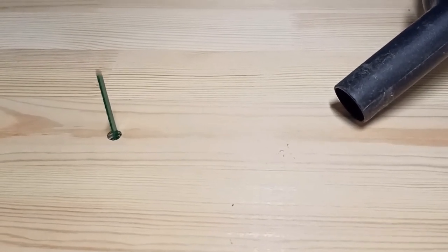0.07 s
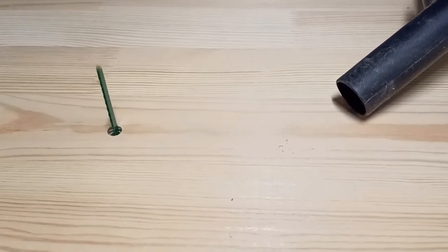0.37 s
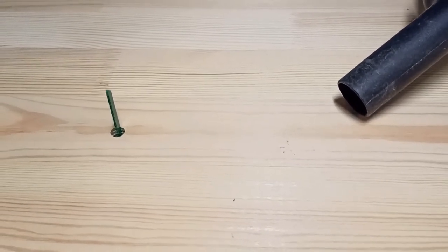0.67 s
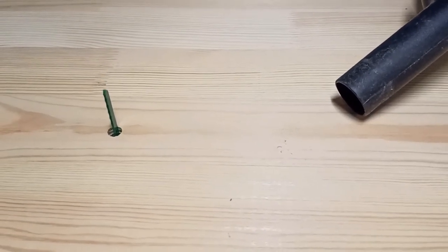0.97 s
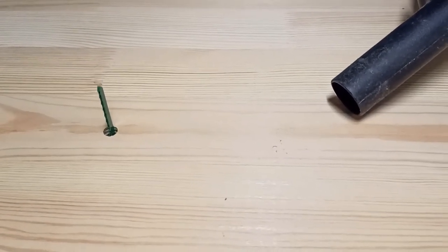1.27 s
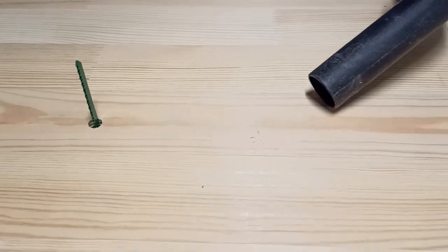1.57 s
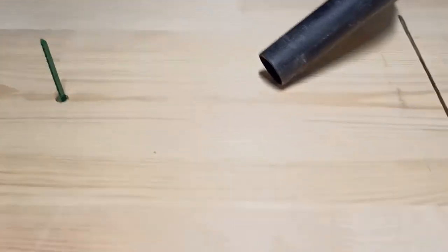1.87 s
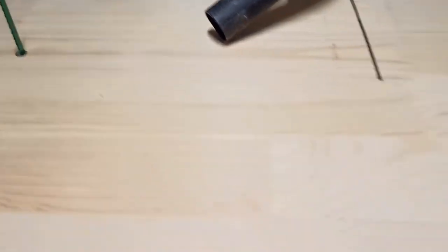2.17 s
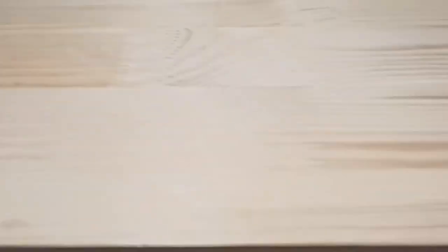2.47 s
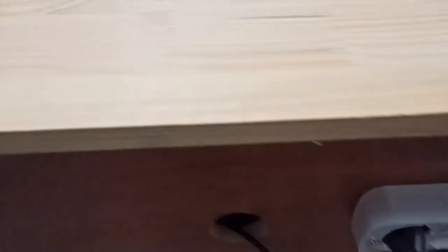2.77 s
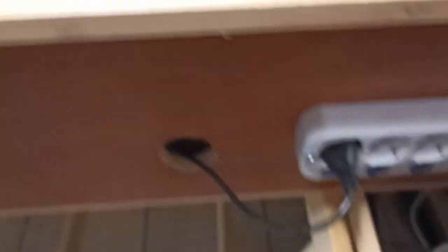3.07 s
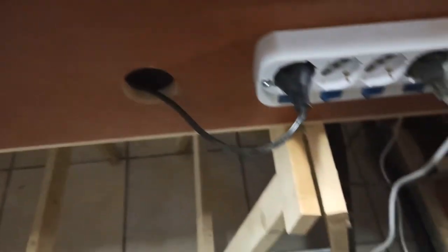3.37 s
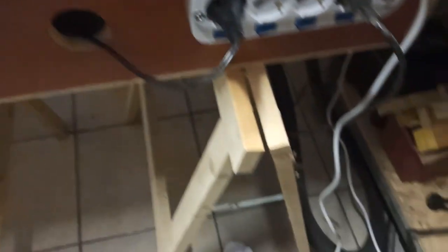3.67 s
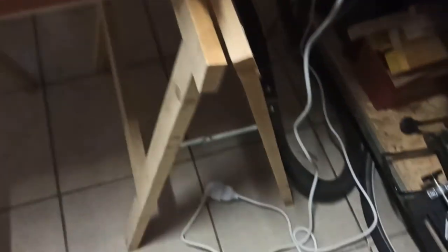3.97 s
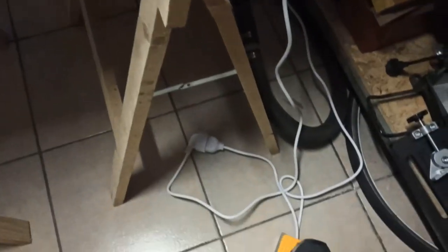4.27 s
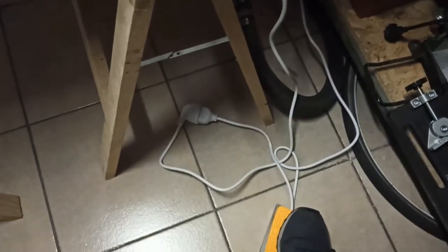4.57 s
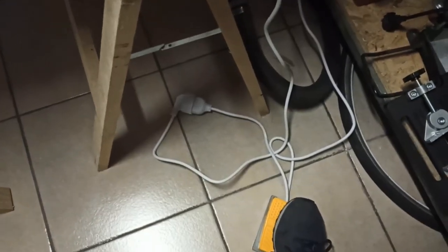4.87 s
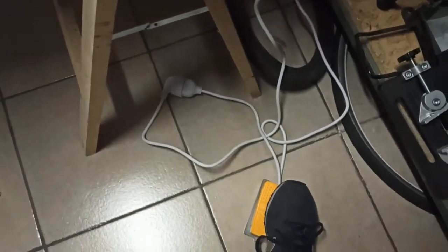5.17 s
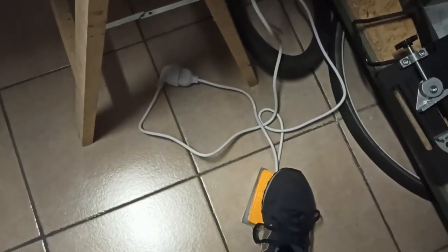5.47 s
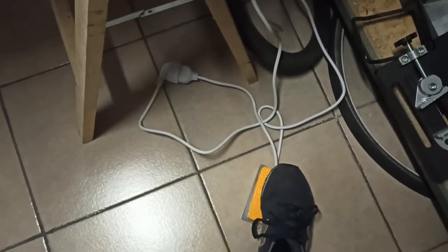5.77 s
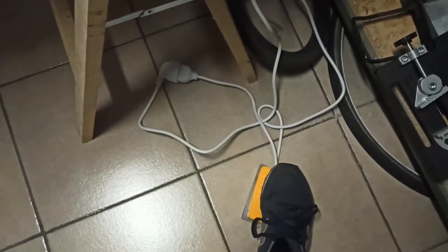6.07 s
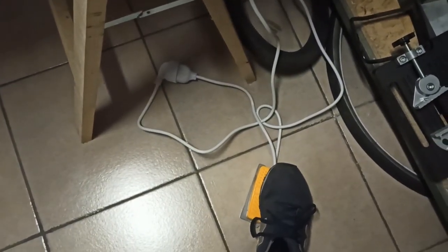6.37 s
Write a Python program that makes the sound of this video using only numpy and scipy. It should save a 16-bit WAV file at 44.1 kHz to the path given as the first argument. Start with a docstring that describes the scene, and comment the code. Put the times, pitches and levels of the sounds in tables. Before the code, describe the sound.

In a small workshop, a hand-held microphone picks up the slowing metallic knocks of a jigsaw, rumbling through a wooden bench. Once it stops, a vacuum is left quietly whining down, interrupted by plastic snaps and dull bumps right at the microphone. After a faint creak from a foot switch, the saw starts with a clink and quickly reaches a loud, whining roar that shakes the bench.

```python
"""A small workshop, beside a wooden bench, heard through the small microphone of a hand-held camera.
A jigsaw mounted under the bench and a vacuum share one foot switch. The saw's blade knocks slower and
slower to a stop, ringing the wood, while the vacuum's impeller whines down. The camera's case clicks
and thumps as it is moved. Then the pedal creaks, and the saw races up to a roar with a whine on top."""
import sys
import numpy as np
from scipy import signal
from scipy.fft import rfft, irfft, next_fast_len
from scipy.io import wavfile

SR = 44100
rng = np.random.default_rng(int(sys.argv[2]) if len(sys.argv) > 2 else 0)


def to_wav(sig):
    """Store sig (one row per channel, or 1-D mono) as 16-bit WAV at the path in sys.argv[1].

    Samples outside -1..1 are clipped; the rate is SR.
    """
    pcm = np.clip(np.atleast_2d(sig), -1, 1) * 32767
    pcm = np.round(pcm).astype(np.int16)
    wavfile.write(sys.argv[1], SR, pcm.T)  # frames by channels


N = 287091
TIME = np.arange(N) / SR
SWITCH_ON_S, BAND_LIMIT_HZ = 5.589, 15950

# room tone spectrum: freq_hz, level_db
ROOM_SPECTRUM = [(60, 1.5), (130, 11), (300, 4.5), (600, 1), (1500, -14), (2600, -15), (3500, -5.5),
                 (4600, -20.5), (5400, -22.5), (6500, -15), (8200, -33), (12000, -5.5), (15500, -13.5)]
# faint hum under the bench: time_s, level_db
HUM_LEVELS = [(1.6, -71.5), (3.5, -56.5), (4.5, -58.5), (5, -52.5), (5.5, -51)]
# the microphone's port resonances and notch: freq_hz, gain_db
MIC_RESPONSE = [(20, -2.5), (48, -11.5), (72, 0), (3000, -4.5), (3700, 0.5), (4680, 1), (4900, -5.5),
                (5900, -3), (6250, 5), (7500, -1), (8400, -10.5), (8900, -32), (10000, -43), (11400, -36.5),
                (11750, -13), (15500, -11.5)]
# bumps of the camera's case in the hand: start_s, level_db, pitch_hz
CASE_BUMPS = [(1.8418, -11, 1010), (1.955, -29, 200), (2.3825, -25.5, 900), (2.4043, -24, 750),
              (2.4242, -19, 780), (3.0672, -11, 567), (3.0976, -30, 680), (3.1842, -3.5, 840),
              (3.3221, -24.5, 398), (3.827, -35, 135), (3.8762, -19.5, 302), (3.898, -29, 135),
              (3.9126, -28.5, 200), (3.99, -29.5, 144), (4.1134, -12, 365), (4.172, -9.5, 295),
              (4.192, -14.5, 179), (4.354, -18.5, 153), (4.543, -25, 132), (4.625, -36.5, 131),
              (4.8605, -7.5, 343)]
# snaps of its hard plastic: start_s, level_db
CASE_SNAPS = [(1.842, -9), (4.193, -14), (4.8382, -32.5), (4.8607, -24)]
# fingers scuffing the case: start_s, level_db, t60_s, brightness_hz
FINGER_SCUFFS = [(1.842, -38, 0.093, 200), (3.067, -35.5, 0.2, 1000), (3.185, -31.5, 0.22, 3500),
                 (3.322, -40, 0.12, 4000), (3.876, -43.5, 0.13, 300), (4.087, -39.5, 0.041, 7000),
                 (4.163, -32.5, 0.11, 900), (4.364, -33.5, 0.088, 900), (4.543, -40, 0.09, 600),
                 (5.418, -53, 0.081, 3000)]

# the vacuum's air, shaded by the bench from 4 s on: time_s, rush_db, treble_db
AIR_LEVELS = [(1.8, -51.5, -39.5), (2.6, -52.5, -43), (3.3, -52.5, -48.5), (3.95, -52, -52),
              (4.3, -53.5, -66.5), (4.9, -55.5, -74), (5.55, -55.5, -75)]
# spectra of its low rush and high hiss: freq_hz, level_db
RUSH_SPECTRUM = [(25, -24), (50, -17), (80, 4), (140, 1), (280, 8.5), (450, -6), (750, 2.5), (1300, -9),
                 (2500, -15), (4500, -23), (7000, -20.5), (15000, -32)]
HISS_SPECTRUM = [(300, -21), (1500, -6.5), (2800, -6.5), (4500, -7.5), (6300, -7.5), (7600, 1), (12000, -5),
                 (15500, -5.5)]
# strongest impeller tones: multiple_of_shaft_rate, level_db
VANE_ORDERS = [(2, -8), (6, -3), (12, -1.5), (18, -7), (24, -6)]
# air whistling in the hose: pitch_hz, width_hz, level_db
HOSE_WHISTLES = [(714, 130, -1), (4534, 200, -2.5), (6770, 300, -4), (7440, 260, 0.5)]

# resonances of the wooden bench top: pitch_hz, width_hz, gain_db
BENCH_MODES = [(138.2, 9.1, 3.5), (149, 15, -5.5), (218.1, 14, 7.5), (255, 60, -10), (410.2, 12, 5.5),
               (463, 21, -2.5), (547, 18, -16), (631.6, 14, -2), (815.4, 15, 7.5), (860, 30, -5.5),
               (944, 24, -5.5), (1143, 13.4, -1), (1621, 120, -12.5), (1840, 92, -25.5), (1840, 7.7, -20)]
# brief low and mid tones while the saw slows or starts: start_s, length_s, pitch_hz, level_db
TONE_SWELLS = [(0.223, 0.3, 813, -23.5), (0.284, 0.25, 84.8, -31), (0.44, 0.16, 820, -22.5),
               (1.201, 0.067, 914, -26), (1.229, 0.072, 827, -20.5), (1.384, .1, 138, -25.5),
               (1.376, 0.23, 417.4, -27), (5.713, 0.1, 228, -16.5)]
# the saw coasting: time_s, rumble_db, gears_db
COAST_LEVELS = [(0, -13.5, -15.5), (.3, -14, -23), (.75, -17, -22.5), (1.03, -15.5, -31.5),
                (1.2, -19.5, -45), (1.46, -24.5, -55), (1.6, -32, -64), (1.72, -39, -54)]
# spectra of the bench's rumble and the unloaded gears: freq_hz, level_db
RUMBLE_SPECTRUM = [(25, -19.5), (50, -35.5), (75, -44.5), (140, 6.5), (330, 0.5), (600, -0.5), (710, -3.5),
                   (900, -0.5), (1400, -35), (2200, -22), (4000, -45.5)]
GRIND_SPECTRUM = [(300, -21), (1300, -4.5), (1900, 15.5), (2600, -7.5), (3900, 7), (5500, 4.5), (7000, 6.5),
                  (15000, -12.5)]
# ring of the steel blade and carrier: pitch_hz, t60_s, level_db
STEEL_MODES = [(3690, 0.093, -11), (4063, 0.14, -6), (4310, 0.17, -4), (6207, 0.051, -7),
               (6300, .07, -13.5)]
# the two ends of the blade's travel, ringing then dry: clack_hz, ring_db, thud_db
TRAVEL_ENDS = [(5300, -8.5, -10.5), (7000, -30, -11)]
# how hard the carrier strikes them: time_s, ringing_end_db, dry_end_db
STRIKE_LEVELS = [(0.05, -13, -11), (.25, -17, -14.5), (.36, -7, -4.5), (.55, -6.5, -20), (.68, -6.5, -4),
                 (.88, -6.5, -5.5), (1.18, -16, -11.5), (1.29, -15, -20), (1.4, -25, -34)]
# the saw under power: time_s, roar_db, gears_db
DRIVE_LEVELS = [(5.6, -18.5, -28.5), (5.66, -17.5, -20), (5.75, -16, -14.5), (5.97, -15.5, -16),
                (6.08, -17.5, -15.5), (6.5, -20, -16.5)]
# spectra of its roar, its gear rattle and the bench's shudder: freq_hz, level_db
ROAR_SPECTRUM = [(60, -46), (110, -3.5), (200, 3), (270, -1), (400, 1.5), (490, -2), (570, 3.5),
                 (720, -3.5), (900, 0.5), (1150, -6), (1800, -18.5), (2600, -12), (4500, -20)]
RATTLE_SPECTRUM = [(300, -22), (1200, 3), (1900, 8.5), (2700, 2.5), (4000, 7), (5500, 1.5), (7000, 0.5),
                   (15000, -13)]
SHUDDER_SPECTRUM = [(20, -18), (48, -9), (70, 20.5), (95, 2), (140, -16), (400, -37.5)]
# tones of the shaking bench: multiple_of_stroke_rate, level_db
SHAKE_ORDERS = [(2, -34), (3, -6), (4, -31), (5, 1.5), (7, -19), (9, -11.5), (13, -9.5), (14, -22),
                (17, -10)]


def amp(db):
    """Decibels to gain."""
    return 10 ** (np.asarray(db) / 20)


def unit(x):
    """Scales to rms 1."""
    return x / np.sqrt(np.mean(x ** 2) + 1e-20)


def curve(rows, column=1):
    """One column of a time table at every sample."""
    columns = np.transpose(rows)
    return np.interp(TIME, columns[0], columns[column])


def add(mix, start_s, sound):
    """Mixes a sound in at start_s."""
    part = mix[max(round(start_s * SR), 0):][:len(sound)]
    part += sound[:len(part)]


def bin_gains(spectrum, size):
    """A spectrum table as one gain per FFT bin."""
    hz, db = np.transpose(spectrum)
    return amp(np.interp(np.log(np.fft.rfftfreq(size, 1 / SR) + 1), np.log(hz), db))


def colour(x, spectrum):
    """Filters by a spectrum table with causal phase."""
    size = 2 * next_fast_len(len(x) // 2 + 8192)
    cepstrum = irfft(np.log(bin_gains(spectrum, size)))
    cepstrum[1:size // 2] *= 2
    cepstrum[size // 2 + 1:] = 0
    return irfft(rfft(x, size) * np.exp(rfft(cepstrum)))[:len(x)]


def noise(spectrum):
    """Noise of rms 1 shaped by a spectrum table."""
    size = 2 * next_fast_len(N // 2 + 1)
    return unit(irfft(rfft(rng.standard_normal(size)) * bin_gains(spectrum, size))[:N])


def wander(per_s):
    """Random drift of rms 1 that turns per_s times a second."""
    knots = rng.standard_normal(8192)
    return unit(np.interp(TIME * per_s, np.arange(len(knots)), knots))


def resonate(x, hz, *widths_hz):
    """Resonances of peak gain 1 in series, one for each width."""
    for width in widths_hz:
        x = signal.lfilter(*signal.iirpeak(hz, hz / min(width, SR / 4), SR), x)
    return x


def lowpass(x, hz, order=2):
    """Dulls the sound above hz."""
    return signal.lfilter(*signal.butter(order, min(hz, SR / 3), fs=SR), x)


def workshop_echo(x, t60, wet_db):
    """Adds the short, dense echo of a small room, keeping the power."""
    t = TIME[:SR // 2]
    tail = rng.standard_normal(len(t)) * amp(-60 * t / t60) * (t > .002)
    echo = signal.fftconvolve(x, tail / np.linalg.norm(tail))[:N]
    return (x + amp(wet_db) * echo) / np.hypot(1, amp(wet_db))


def room_tone(hum_hz=72.5, room_db=-60):
    """Faint room noise, and a low hum that grows as the microphone nears the floor."""
    phase = 2 * np.pi * hum_hz * TIME + .59 * wander(.69)
    hum_gain = np.sqrt(2) * amp(curve(HUM_LEVELS) + 3.2 * wander(18))
    hum = amp(-14) * np.sin(phase) + np.sin(2 * phase)
    return hum_gain * hum + amp(room_db) * noise(ROOM_SPECTRUM)


def pedal_creak(start_s=5.416, db=-39, hz=780, width_hz=300, t60=.088, attack_s=.003):
    """The pedal creaks softly under the shoe just before it switches."""
    age = np.maximum(TIME - start_s, 0)
    creak = unit(resonate(rng.standard_normal(N), hz, width_hz, 2 * width_hz))
    return amp(db - 60 * age / t60) * (1 - np.exp(-age / attack_s)) * creak


def handling_noise(firm_hz=250, case_hz=3800, boom_hz=130, boom_t60=.19, snap_s=.00047):
    """Right at the microphone: damped bumps, plastic snaps and scuffs of skin come through the case."""
    out, t = np.zeros(N), TIME[:SR // 5]
    push = signal.unit_impulse(len(t))
    boom = np.sin(2 * np.pi * boom_hz * t) * amp(-23 - 60 * t / boom_t60)
    for start_s, db, hz in CASE_BUMPS:
        firmness = min(1, hz / firm_hz) ** 3  # low blows are soft ones, without any click
        pulse = lowpass(resonate(push, hz, .76 * hz), 5.1 * hz, order=1)
        pulse = lowpass(pulse, case_hz * firmness, order=6)
        bump = pulse / abs(pulse).max() + boom * 2 * boom_hz / hz  # soft blows boom most
        add(out, start_s, amp(db) * bump)
    for start_s, db in CASE_SNAPS:
        crack = rng.standard_normal(len(t)) * np.exp(-t / snap_s)
        add(out, start_s, amp(db) * (lowpass(crack, 7200, order=8) + .24 * crack))
    for start_s, db, t60, brightness_hz in FINGER_SCUFFS:
        rub = lowpass(rng.standard_normal(len(t)), brightness_hz, order=1)
        rub = unit(rub - lowpass(rub, 110, order=1))
        add(out, start_s, amp(db - 60 * t / t60) * (1 - np.exp(-t / .0028)) * rub)
    return out


def vacuum(start_turns_per_s=990, stop_s=5.22, vane_db=-13.5, whirr_db=-19.5, hose_db=-7, flutter_db=3):
    """The impeller freewheels: fuzzy vane tones sink through fading air noise and fixed hose whistles."""
    speed = start_turns_per_s * np.maximum(1 - TIME / stop_s, 0) ** 2
    shaft = 2 * np.pi * np.cumsum(speed) / SR

    def shaft_tone(order, smear_hz):
        """One multiple of the shaft rate, smeared by turbulence into a narrow band."""
        band = wander(smear_hz) * np.cos(order * shaft) + wander(smear_hz) * np.sin(order * shaft)
        return band * (order * speed < BAND_LIMIT_HZ)

    vanes = sum(amp(vane_db + db + flutter_db * wander(13)) * shaft_tone(order, 200)
                for order, db in VANE_ORDERS)
    whirr = sum(shaft_tone(order, 110) * amp(flutter_db * wander(6.7)) for order in range(14, 64, 2))
    whirr = amp(whirr_db) * lowpass(whirr, 8000, order=1)
    hose = unit(sum(amp(db) * unit(resonate(rng.standard_normal(N), hz, width, width))
                    for hz, width, db in HOSE_WHISTLES))
    hiss = noise(HISS_SPECTRUM)
    mellow = lowpass(hiss, 3500, order=1)
    hiss = mellow + (hiss - mellow) * amp(np.interp(TIME, [2, 4], [0, -6]))  # slower air hisses lower
    tone_fade = np.interp(TIME, [3.5, 4.3], [1, 0])
    treble = hiss + tone_fade * (vanes + whirr + amp(hose_db) * hose)
    rush = amp(curve(AIR_LEVELS) + 1 + 1.2 * wander(23)) * noise(RUSH_SPECTRUM)
    return rush + amp(curve(AIR_LEVELS, column=2)) * treble


def bench(x, flutter_db=3):
    """The wooden top rings with whatever shakes it, each resonance fluttering in strength."""
    return sum(amp(db + flutter_db * wander(16)) * resonate(x, hz, width)
               for hz, width, db in BENCH_MODES)


def tone_swells(waver_rad=.82, flutter_db=2):
    """Brief, wavering low and mid tones that swell while the saw slows or starts."""
    out, drift = np.zeros(N), waver_rad * wander(70)
    for start_s, length_s, hz, db in TONE_SWELLS:
        swell = np.sin(np.pi * np.clip((TIME - start_s) / length_s, 0, 1) ** .7)
        out += np.sqrt(2) * amp(db) * swell * np.sin(2 * np.pi * hz * TIME + drift)
    return out * amp(flutter_db * wander(60))


def blade_reversals(start_strokes_per_s=25, friction_per_s=52.1, drag_s=4.2524, start_count=.957):
    """Running count of blade reversals, two a stroke, as drag and dry friction slow the saw."""
    speed = (start_strokes_per_s + friction_per_s) * np.exp(-TIME / drag_s) - friction_per_s
    return start_count + 2 * np.cumsum(np.maximum(speed, 0)) / SR


def saw_coasting(surge_db=2, lag_reversals=.23, roughness_db=2):
    """Loose gears grind and the bench rumbles, surging after each reversal, until friction stops them."""
    surge = surge_db * np.cos(2 * np.pi * (blade_reversals() - lag_reversals))
    wood = amp(-3) * unit(bench(rng.standard_normal(N))) + amp(surge - 6) * noise(RUMBLE_SPECTRUM)
    gears = workshop_echo(noise(GRIND_SPECTRUM), t60=.12, wet_db=-3)
    gears *= amp(curve(COAST_LEVELS, column=2) - 5 + roughness_db * wander(260))
    wood *= amp(curve(COAST_LEVELS) + roughness_db * wander(90))
    turning = np.interp(TIME, [1.55, 1.75], [1, 0])
    return turning * (wood + gears)


def blade_knocks(clack_t60=.017, clack_width_hz=2800, thud_t60=.012, thud_fade_db_per_s=3):
    """Each reversal of the coasting blade clacks, rings the steel and thuds into the bench."""
    t, reversals = TIME[:SR // 5], blade_reversals()
    metal, blows = np.zeros(N), np.zeros(N)
    strike_db = curve(STRIKE_LEVELS), curve(STRIKE_LEVELS, column=2)
    clack_envelope = amp(-60 * t / clack_t60) * (1 - np.exp(-t / .00025))
    for count in range(1, int(reversals[-1]) + 1):
        end = count % 2
        at = np.searchsorted(reversals, count - .0165 * end)  # the dry end is struck a little early
        start_s = TIME[at]
        clack_hz, ring_db, thud_db = TRAVEL_ENDS[end]
        chatter, push, phases = rng.standard_normal((3, len(t)))
        clack = unit(resonate(chatter, clack_hz, clack_width_hz, 2 * clack_width_hz)) * clack_envelope
        ring = sum(amp(db - 60 * t / t60) * np.sin(2 * np.pi * (hz * t + phase))
                   for (hz, t60, db), phase in zip(STEEL_MODES, phases))
        add(metal, start_s, amp(strike_db[end][at] - 3) * (clack + amp(ring_db) * ring))
        add(blows, start_s, amp(thud_db - thud_fade_db_per_s * start_s - 60 * t / thud_t60) * push)
    wood = amp(10) * bench(blows) + amp(-10) * lowpass(blows, 1200)
    return workshop_echo(metal, t60=.13, wet_db=-7) + wood


def gear_clink(db=-11, hz=4300, t60=.016):
    """The gear teeth take up their slack as the current comes on."""
    age = np.maximum(TIME - SWITCH_ON_S, 0)
    envelope = amp(db - 60 * age / t60) * (1 - np.exp(-age / .00026))
    return envelope * np.sin(2 * np.pi * hz * age + .5 * wander(1300))


def saw_running(top_strokes_per_s=46.35, spin_up_s=.164, shudder_at_per_s=36, whine_from_per_s=39.3):
    """Under power the knocks merge into a roar, the bench shakes and near top speed the armature whines."""
    age = np.maximum(TIME - SWITCH_ON_S, 0)
    speed = top_strokes_per_s * (1 - np.exp(-age / spin_up_s))
    strokes = np.cumsum(speed * (1 + .0012 * wander(60))) / SR
    beat_db = 5 * (np.exp(-(2 * strokes % 1) / .2) - .2)  # two reversals a stroke
    # every stroke sets off the same clatter, which makes a comb of harmonics
    kicks = np.diff(np.floor(strokes), prepend=0)
    clatter = colour(workshop_echo(kicks, t60=.2, wet_db=20), ROAR_SPECTRUM)
    clatter /= clatter[TIME > SWITCH_ON_S].std()
    roar = amp(-2) * noise(ROAR_SPECTRUM) + amp(-7.5) * clatter
    roar += amp(-9) * unit(bench(rng.standard_normal(N)))
    roar *= amp(curve(DRIVE_LEVELS) + .21 * beat_db)
    gears = workshop_echo(noise(RATTLE_SPECTRUM), t60=.12, wet_db=-3)
    gears *= amp(curve(DRIVE_LEVELS, column=2) - 2.5 + beat_db)
    # the bench shudders briefly as the stroke rate passes one speed
    shudder = amp(-30) * noise(SHUDDER_SPECTRUM) / (1 + ((speed - shudder_at_per_s) / 2.2) ** 2)
    shake = sum(amp(db + wander(12)) * np.sin(2 * np.pi * (order * strokes + rng.random()))
                for order, db in SHAKE_ORDERS)
    shake *= amp(-18 - 1.5 * (top_strokes_per_s - speed))  # harder with speed
    armature = 2 * np.pi * 152.3 * strokes + .5 * wander(300)  # 152.3 cycles of whine a stroke
    whine = (np.sin(armature) + amp(-6) * np.sin(2 * armature)) * amp(-28 + 4.2 * wander(70))
    whine *= .5 + .5 * np.tanh((speed - whine_from_per_s) / .8)
    fade_in = np.minimum(age / .025, 1)
    return fade_in * (roar + gears + shudder + np.sqrt(2) * (shake + whine))


def scene():
    """All sources as they reach the microphone, the same in both channels."""
    saw = blade_knocks() + saw_coasting() + tone_swells() + gear_clink() + saw_running()
    mono = saw + vacuum() + room_tone() + handling_noise() + pedal_creak()
    return np.array([mono, mono])


def record(dry):
    """One small microphone colours the sound, and a steep band limit cuts the top."""
    heard = colour(dry.mean(0), MIC_RESPONSE)
    band_limit = signal.firwin(511, BAND_LIMIT_HZ, window=("kaiser", 9), fs=SR)
    heard = signal.oaconvolve(heard, band_limit, "same")
    return np.array([heard, heard])


dry = scene()
out = record(dry)
to_wav(out)
```